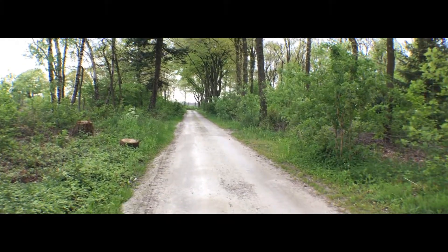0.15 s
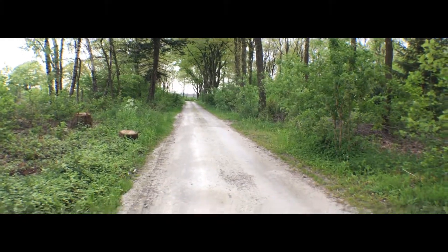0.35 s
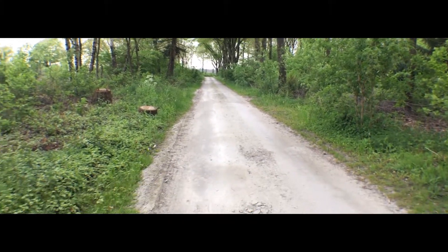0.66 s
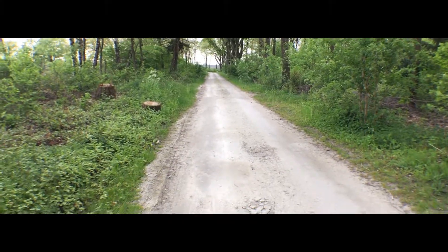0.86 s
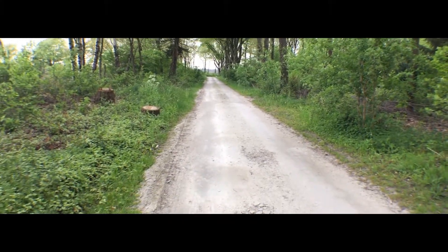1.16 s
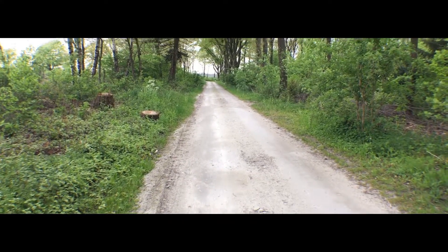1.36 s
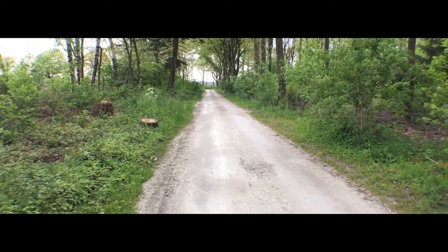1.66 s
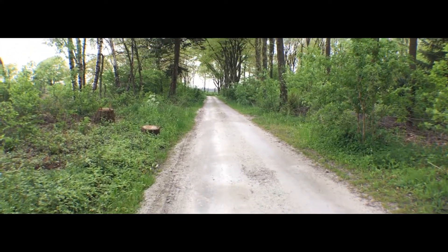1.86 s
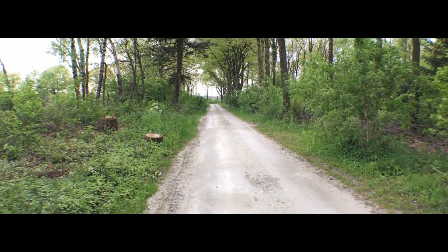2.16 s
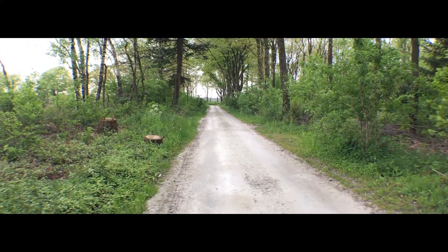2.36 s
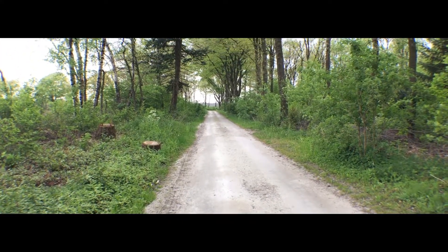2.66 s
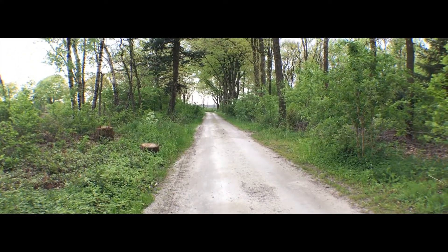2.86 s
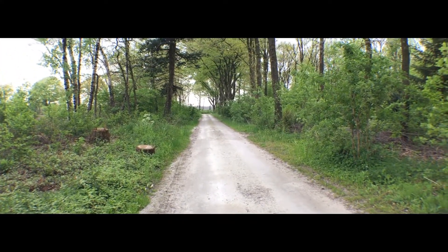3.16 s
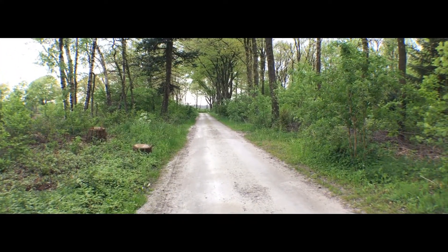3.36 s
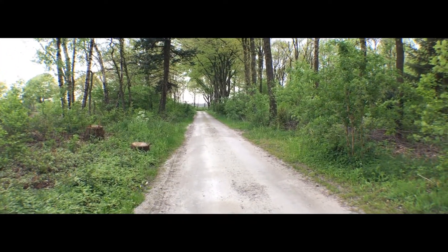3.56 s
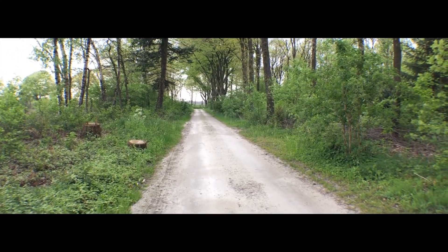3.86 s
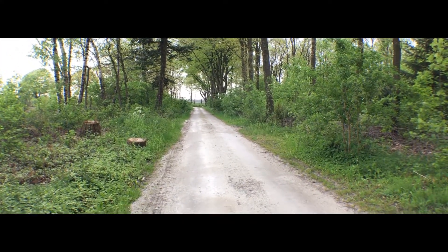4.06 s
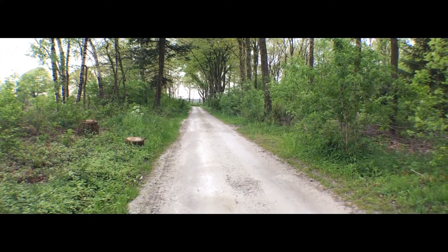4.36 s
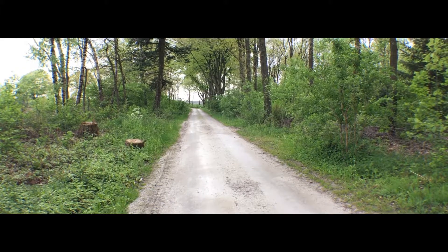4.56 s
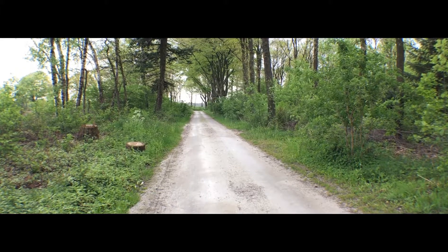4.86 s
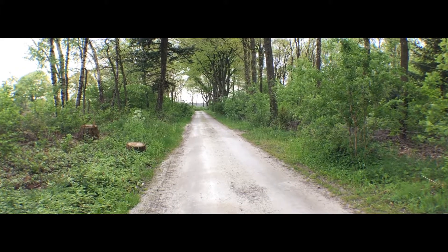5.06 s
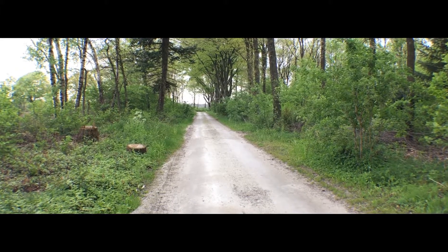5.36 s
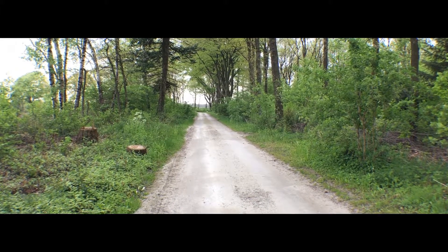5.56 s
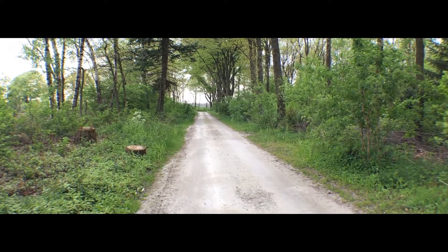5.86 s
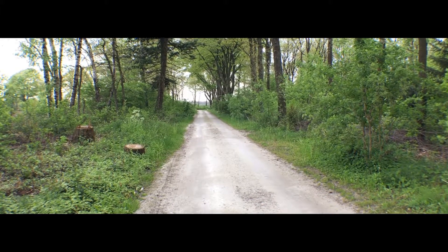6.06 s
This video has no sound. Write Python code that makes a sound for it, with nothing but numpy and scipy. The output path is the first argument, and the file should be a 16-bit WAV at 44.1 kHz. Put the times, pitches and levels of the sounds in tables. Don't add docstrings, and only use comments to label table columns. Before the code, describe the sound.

Outdoors on a woodland track, heard through a slightly dull hand-held microphone. From 0 s a blurred chorus of far small birds throbs, with quick falling chips and whistles echoing off trunks. A nearer bird gives a thin, high falling trill at 0.4-0.65 s. Fingers tick the shell; a hard, sharp knock with small bounces lands near 0.7 s, followed by brief rubbing until about 1.5 s. High sliding notes answer at 1.1 s and 2 s, and the chorus swells near 1.5 s, then fades. One bird's short upward call repeats roughly every 0.8 s from 2 s to 6.2 s, among sparser whistles. A faint dove coos low at 3 s and longer at 5.5 s. Rubbing at 4-4.3 s leads to a knock at 4.6 s. Throughout, deep rumble, steady low hum, soft road roar and faint passing tyre whine.

```python
import sys
import numpy as np
from scipy import signal
from scipy.fft import rfft, irfft
from scipy.io import wavfile
from scipy.ndimage import uniform_filter1d

SR = 44100
rng = np.random.default_rng(int(sys.argv[2]) if len(sys.argv) > 2 else 0)


def wav_record(signal):
    frames = np.transpose(np.atleast_2d(signal))
    bounded = np.clip(frames, -1, 1)
    quanta = np.round(bounded * 32767).astype(np.int16)
    wavfile.write(sys.argv[1], SR, quanta)


def undo_db(level):
    steps = np.asarray(level, float) / 20
    return 10 ** steps


N = 274302


def shape(x, points):
    hz, db = np.transpose(points)
    bin_hz = np.arange(len(x) // 2 + 1) * SR / len(x)
    gain_db = np.interp(np.log(bin_hz + 1), np.log(hz), db)
    return irfft(rfft(x) * undo_db(gain_db), len(x))


def colour(x, points):
    y = shape(x, points)
    return y / np.std(y)


def walk(rate_hz):
    k = int(SR / rate_hz)
    held = np.repeat(rng.standard_normal(N // k + 1), k)
    slewed = uniform_filter1d(uniform_filter1d(held, k), k)
    return 1.3 * slewed[:N]


def add(out, start_s, sound):
    i = max(int(start_s * SR), 0)
    out[i:i + len(sound)] += sound[:N - i]


def tone(hz):
    return np.sqrt(2) * np.sin(2 * np.pi * np.cumsum(hz) / SR)


def trees(x, t60_s, wet_db, stir_hz):
    t = np.arange(SR) / SR
    build_up = np.minimum(t / 0.013, 1)
    tail = rng.standard_normal(SR) * np.exp(-np.log(1000) * t / t60_s) * build_up
    stirred = x * np.sqrt(2) * np.sin(2 * np.pi * walk(stir_hz / 2))
    echo = signal.fftconvolve(stirred, tail / np.linalg.norm(tail))[:N]
    return x + undo_db(wet_db) * echo * undo_db(2 * walk(40))


def slides(notes, early=.5):
    return [(s, length_s, hz_a, hz_a + early * (hz_c - hz_a), hz_c, db)
            for s, length_s, hz_a, hz_c, db in notes]


def songs(notes, edge, fade_db, waver):
    out = np.zeros(N)
    unsteady = 1 + waver * walk(90)
    for start_s, length_s, hz_a, hz_b, hz_c, db in notes:
        u = np.linspace(0, 1, max(int(length_s * SR), 16))
        bend_hz = (hz_a + hz_c - 2 * hz_b) * 2 * (u - .5) ** 2
        hz = hz_b + (hz_c - hz_a) * (u - .5) + bend_hz
        hz = hz * unsteady[int(start_s * SR):][:len(u)]
        level = undo_db(db - fade_db * (u - .5)) * signal.windows.tukey(len(u), edge)
        add(out, start_s, level * tone(hz))
    return out * undo_db(1.3 * walk(50) + 1.3 * walk(160))


# (time [s], lowest pitch [Hz], level [dB])
TRILL = [
    (.41, 8270, -71),
    (.435, 8300, -68),
    (.46, 8400, -65),
    (.488, 8250, -62),
    (.511, 7850, -58),
    (.544, 7620, -58),
    (.575, 7000, -58),
    (.606, 6880, -59),
]
# (time [s], middle pitch [Hz], level [dB])
FLICKS = [
    (.628, 6400, -57),
    (2.029, 6800, -66),
    (2.16, 6700, -65),
    (2.364, 6500, -65),
]
# (time [s], length [s], start pitch [Hz], end pitch [Hz], level [dB])
NEAR_NOTES = [(.637, .03, 6390, 6400, -68), (.674, .11, 6350, 6480, -62), (.67, .064, 5790, 5665, -75),
              (1.124, .013, 5450, 6850, -60), (1.135, .038, 6960, 7260, -53),
              (1.168, .026, 7650, 7880, -61), (1.17, .035, 7300, 7450, -63), (1.21, .03, 8370, 8160, -75),
              (1.225, .02, 7600, 7050, -67), (1.245, .04, 7080, 7040, -76), (1.25, .03, 7430, 7520, -72),
              (1.562, .018, 7660, 6710, -72), (1.981, .011, 7000, 7500, -60), (1.99, .008, 7500, 8100, -66),
              (1.998, .014, 8140, 7330, -65), (2.008, 0.023, 7930, 8120, -65), (2.07, .03, 7140, 7110, -74),
              (2.115, .016, 7210, 7580, -61), (2.13, .011, 8420, 7590, -69), (2.134, .026, 7560, 7900, -65),
              (2.163, .005, 5650, 5300, -63), (2.1, .015, 7400, 7300, -72), (2.26, .11, 7370, 7500, -73.5),
              (2.385, .025, 5720, 5270, -76), (5.2, 0.088, 5820, 6460, -81)]


def near_bird():
    trill = []
    for s, hz, db in TRILL:
        scoop_out_hz = 200 + .4 * (8400 - hz)
        trill.append((s, .025, hz + 120, hz, hz + scoop_out_hz, db))
    fall_hz = 1710
    flicks = [(s, .005, hz + fall_hz / 2, hz - fall_hz / 2, db) for s, hz, db in FLICKS]
    song = songs(trill + slides(NEAR_NOTES + flicks), edge=.35, fade_db=3, waver=.007)
    return trees(song, t60_s=.5, wet_db=-5, stir_hz=250)


# (time of the steep rise [s], lead-in stretch [ratio], level [dB], extra level of the rise [dB])
RISING_CALLS = [
    (1.985, 1.04, -57, -11),
    (2.745, 1.0, -67, -3),
    (3.568, .9, -60, -3),
    (4.413, 1.7, -63, -2),
    (5.335, 1.2, -60, -10),
    (6.152, 1.5, -64, -4),
]
# (time from the rise [s], pitch [Hz], level [dB])
RISING_SHAPE = [
    (-.028, 3220, -14),
    (-.016, 3250, -4),
    (0, 3388, -7),
    (.012, 3620, 4),
    (.02, 3995, -1.5),
    (.036, 4050, -5),
    (.044, 4050, -25),
]


def rising_calls():
    out = np.zeros(N)
    s, hz, db = np.transpose(RISING_SHAPE)
    for rise_s, stretch, call_db, rise_db in RISING_CALLS:
        knots = np.where(s < 0, s * stretch, s)
        t = np.arange(knots[0], knots[-1], 1 / SR)
        level_db = call_db + np.interp(t, knots, db + rise_db * (s > 0))
        add(out, rise_s + knots[0], undo_db(level_db) * tone(np.interp(t, knots, hz)))
    return trees(out * undo_db(2.7 * walk(150)), t60_s=.75, wet_db=2.5, stir_hz=110)


# (time [s], length [s], pitch [Hz], level [dB])
HELD = [(0, .018, 2630, -59), (.145, .05, 2720, -62), (.243, .035, 4350, -69), (.105, .035, 4280, -65),
        (.695, .085, 2690, -66), (.935, .045, 4420, -65), (.99, .025, 4500, -67), (1.01, .03, 4200, -66),
        (1.045, .035, 4440, -65), (1.14, .03, 3950, -67), (1.165, .03, 3380, -64), (1.405, .065, 3250, -62),
        (1.64, .1, 3700, -64), (1.752, .022, 3640, -62), (2.779, .014, 3500, -56), (2.73, .03, 4380, -68),
        (2.255, .03, 5150, -72), (3.875, .03, 3500, -77), (4.08, .13, 3550, -70), (.02, .12, 1955, -65.5),
        (.092, .045, 2730, -62), (.75, .12, 4410, -75), (2.458, 0.24, 5320, -76), (1.4, .062, 3280, -61.5),
        (1.555, .095, 3720, -63), (1.6, .045, 2483, -60), (1.6, .06, 3030, -74), (2.1, .11, 5140, -80),
        (2.329, 0.051, 3125, -57.5), (2.41, 0.046, 5295, -60), (2.54, .07, 4380, -62.5),
        (2.539, 0.11, 3294, -63), (2.548, .1, 2870, -67), (2.68, .04, 4380, -67), (2.664, .06, 3645, -61),
        (3.92, .055, 3580, -74), (5.303, .033, 6010, -83), (5.3, .14, 5290, -80), (5.421, .11, 4350, -66),
        (5.64, .018, 4340, -74), (5.86, .05, 3170, -71), (5.854, 0.062, 2885, -67), (5.948, .02, 3400, -66),
        (5.99, .1, 3800, -74), (6.01, .08, 5420, -74)]
# (time [s], length [s], pitch [Hz], level [dB])
COOS = [
    (2.974, .074, 678, -59),
    (5.553, .34, 655, -64),
]
# (time [s], length [s], start pitch [Hz], end pitch [Hz], level [dB])
SLURS = [(.026, .035, 2650, 2700, -60), (.052, .03, 2710, 2750, -56), (.18, .02, 2330, 2460, -62),
         (.195, .055, 2460, 2480, -61), (.243, .055, 2380, 2290, -59), (.296, .025, 2330, 2270, -56),
         (.784, .03, 2570, 2480, -60), (.806, .1, 2480, 2455, -61), (.896, .075, 2455, 2430, -65),
         (1.176, .05, 2700, 2520, -70), (1.22, .075, 2540, 2680, -66), (.34, .02, 3450, 3900, -64),
         (2.678, .05, 3180, 3310, -64), (.28, .04, 2920, 2820, -63), (0.317, .05, 2130, 2045, -66),
         (.462, .044, 3500, 3340, -54), (.82, .11, 3060, 3120, -70), (1.098, 0.13, 3210, 3390, -68),
         (1.31, .03, 3600, 3520, -64), (1.333, .048, 3520, 3110, -58), (1.5, 0.043, 4735, 4915, -71),
         (2.299, .022, 3120, 2850, -62), (2.372, 0.17, 3190, 3360, -57), (2.52, 0.0296, 3260, 2810, -58.5),
         (2.733, .035, 3620, 3520, -65), (5.445, 0.077, 4130, 4300, -71), (5.53, .06, 5220, 5130, -76),
         (5.944, .06, 5620, 5420, -71), (5.458, .028, 3620, 2800, -69), (5.55, .045, 3255, 3180, -62.5),
         (5.902, .042, 3130, 3750, -70)]


def far_whistlers():
    held = [(s, length_s, hz, hz, db) for s, length_s, hz, db in HELD + COOS]
    song = songs(slides(held + SLURS, early=.64), edge=.22, fade_db=3, waver=.005)
    return trees(song, t60_s=.72, wet_db=-4, stir_hz=70)


# (time [s], middle pitch [Hz], fall [Hz], level [dB])
CHIPS = [(0, 3400, 50, -56), (.012, 3400, 30, -51), (.022, 3390, 30, -52), (.08, 3510, 180, -59),
         (.1, 4340, 50, -65), (.143, 3520, 90, -54.5), (.155, 3930, 30, -61), (.178, 3500, 340, -55),
         (.215, 3410, 200, -57), (.545, 3310, 150, -60), (.56, 3520, 400, -60), (.61, 3600, 60, -58),
         (1.06, 3200, 300, -59), (1.397, 3150, 800, -58), (1.475, 3250, 600, -58), (1.528, 2930, 250, -60),
         (1.58, 3110, 720, -56), (1.68, 3150, 700, -56)]


def chips():
    notes = [(s, .013, hz + fall_hz / 2, hz - fall_hz / 2, db) for s, hz, fall_hz, db in CHIPS]
    song = songs(slides(notes), edge=.41, fade_db=5, waver=.01)
    return trees(song, t60_s=.84, wet_db=-1.5, stir_hz=150)


# (time [s], centre pitch [Hz], level [dB])
CHORUS = [
    (0, 3450, -60.5),
    (.35, 3456, -64.5),
    (.7, 3696, -70),
    (.95, 3800, -62),
    (1.2, 3780, -62),
    (1.3, 3490, -67),
    (1.5, 3197, -59),
    (1.75, 3300, -69.5),
    (2.7, 3610, -85),
]


def chorus():
    t = np.arange(N) / SR
    s, centre_hz, level_db = np.transpose(CHORUS)
    hz, db = np.interp(t, s, centre_hz), np.interp(t, s, level_db)
    reach_hz = 430 + (760 - 430) / (1 + np.exp((t - 1.3) / .12))
    voices = np.zeros(N)
    for place in np.linspace(-1, 1, 8):
        throb = undo_db(2 * walk(35))
        hops = .15 * walk(15) + .2 * walk(70)
        voices += throb * tone(hz + reach_hz * (place + hops))
    return trees(voices * undo_db(db - 16.5), t60_s=.36, wet_db=5.7, stir_hz=200)


# (time [s], peak level [dB], contact [ms])
KNOCKS = [
    (.6632, -25, .033),
    (.683, -39, .2),
    (.6885, -39, .08),
    (0.78, -46, 0.047),
    (2.366, -52, 0.089),
    (4.598, -47, .1),
    (4.6109, -35, .15),
]
# (frequency [Hz], level [dB], 60 dB decay [s])
SHELL = [(316, -2, .05), (660, -23, 0.023), (885, 10.5, .023), (1160, -29, 0.019), (1494, 3, 0.025),
         (1555, -9, .15), (1900, -3, .008), (2275, 0, 0.016), (3390, 4, .013), (4520, 7, .006),
         (5400, 2, .005), (7300, -12, .007), (9050, -6, .011), (13200, 2, .003)]


def knocks():
    out = np.zeros(N)
    t = np.arange(int(.08 * SR)) / SR
    ring = np.zeros(len(t))
    for hz, db, t60_s in SHELL:
        envelope = np.exp(-np.log(1000) * t / t60_s) * np.tanh(hz * t / 0.83)
        ring += undo_db(db) * envelope * np.sin(2 * np.pi * hz * t)
    for start_s, db, contact_ms in KNOCKS:
        push = np.exp(-(t[:200] * 1000 / contact_ms - 2) ** 2)
        blow = np.convolve(ring, push)
        add(out, start_s, undo_db(db) * blow / abs(blow).max())
    return out


# (time [s], peak level [dB], brightness [dB per octave])
TICKS = [(.028, -55, 4), (.237, -57, 6), (.294, -58, 5), (.314, -58, 4), (.363, -55, 3), (.5988, -45, -2),
         (.606, -52, -2), (.6632, -36, -1), (.6895, -45, -1), (.712, -56, -1), (.988, -55, 5),
         (1.093, -58, 5), (1.373, -59, 3), (1.417, -55, 4), (1.53, -58, 1), (2.073, -60, 3),
         (2.168, -60, 4), (2.365, -46, -8.5), (2.439, -56, 1), (4.47, -68, 8), (4.52, -60, 2),
         (4.598, -52, -1), (4.6104, -55, 1), (4.621, -54, 8), (4.731, -72, 5), (4.739, -60, 5)]


def ticks():
    out = np.zeros(N)
    t = np.arange(1024) / SR
    rise_s = .0006
    for start_s, db, tilt_db in TICKS:
        outline = [(hz, level_db + tilt_db * np.log2(hz / 5000)) for hz, level_db in RUB_COLOUR]
        noise = colour(rng.standard_normal(len(t)), outline)
        crack = noise * t / rise_s * np.exp(1 - t / rise_s)
        add(out, start_s, undo_db(db) * crack)
    return out


# (time [s], length [s], level [dB], swell [dB])
RUBS = [(.602, 0.053, -62, 0), (.77, .055, -65, 0), (.967, 0.011, -55.5, 0), (.982, .024, -58, -3),
        (1.068, .035, -60, -5), (1.099, .23, -66.5, -4), (1.5, 0.066, -61.5, 5), (2.368, .075, -67, -13),
        (3.982, .02, -66, 0), (4.064, .085, -63.5, 0), (4.149, .125, -65, 0), (4.274, .068, -59, -2)]
# (frequency [Hz], level [dB])
RUB_COLOUR = [(1400, -12), (2200, -3), (3500, -2), (4500, -7), (4810, -2), (5200, -9), (7000, -11),
              (8400, -17), (9050, -10), (9900, -20), (11100, -13), (12300, -18), (13500, -8), (14500, -13),
              (15500, -17)]


def rubs():
    t = np.arange(N) / SR
    pressure = np.zeros(N)
    for s, length_s, db, swell_db in RUBS:
        swell = swell_db * np.clip((t - s) / length_s - .5, -.5, .5)
        from_edge_s = np.minimum(t - s, s + length_s - t)
        contact = np.clip(from_edge_s / .008 + .5, 0, 1) ** 2
        pressure += undo_db(db + swell) * contact
    slips = rng.standard_normal(N) * undo_db(2.1 * walk(300))
    return pressure * colour(slips, RUB_COLOUR)


# (time nearest [s], heard for plus or minus [s], tyre whine [Hz], level [dB])
CARS = [
    (.95, .17, 1560, -62),
    (1.35, .2, 1520, -66),
    (1.85, .4, 1540, -61.5),
    (2.3, .15, 1905, -65),
    (3.1, .2, 1850, -61.5),
    (4.15, .2, 1867, -62),
    (5.1, .25, 2100, -63),
    (6.05, .2, 2140, -59),
]


def tyres():
    t = np.arange(N) / SR
    s, heard_s, hz, db = np.transpose(CARS)[:, :, None]
    power = undo_db(2 * db) / (1 + ((t - s) / heard_s) ** 2) ** 2
    total = power.sum(axis=0)
    band = [(1, -11), (200, -5), (420, -22), (20000, -56.5)]
    slow_a = colour(rng.standard_normal(N), band)
    slow_b = colour(rng.standard_normal(N), band)
    turn = 2 * np.pi * np.cumsum((power * hz).sum(axis=0) / total) / SR
    whine = slow_a * np.cos(turn) + slow_b * np.sin(turn)
    return whine * np.sqrt(total) * undo_db(0.4)


# (frequency [Hz], level [dB per Hz])
ROAD = [(200, -7.5), (450, -7), (650, -2), (760, -5), (900, -1.5), (1300, -1.5), (1600, -6.5),
        (2400, -14.5), (2800, -20), (3400, -18), (5000, -26), (8000, -30), (16000, -43.5)]
# (frequency [Hz], gain [dB])
LULL_BAND = [(1000, -30), (1300, -3), (1700, 0), (2000, -30)]


def roar():
    t = np.arange(N) / SR
    noise = colour(rng.standard_normal(N), ROAD) * undo_db(-55 + .5 * walk(1.03))
    lull_ends_s, fade_s, share = .42, .06, .5
    lull = share / (1 + np.exp((t - lull_ends_s) / fade_s))
    return noise - lull * shape(noise, LULL_BAND)


# (frequency [Hz], level [dB per Hz])
RUMBLE = [(12, -24), (22, -8.5), (32, -2), (55, 2), (80, -4.5), (130, -11), (175, -19), (300, -21),
          (500, -27.5), (1000, -54)]


def rumble():
    return colour(rng.standard_normal(N), RUMBLE) * undo_db(-44.5 + 0.2 * walk(3.015))


# (frequency [Hz], level [dB])
HUM = [
    (49.2, -39),
    (98.4, -58),
]


def hum():
    return sum(undo_db(db) * tone(np.full(N, hz)) for hz, db in HUM)


def scene():
    birds = near_bird() + rising_calls() + far_whistlers() + chips() + chorus()
    hands = trees(knocks() + ticks(), t60_s=.21, wet_db=-11, stir_hz=400) + rubs()
    background = tyres() + roar() + rumble() + hum()
    return (birds + hands + background)[None]


def low_pass(x):
    return signal.sosfilt(signal.butter(12, 15840, fs=SR, output="sos"), x)


# (frequency [Hz], gain [dB])
MICROPHONE = [(10, -0.5), (7000, -1.5), (7800, -5), (9050, -2.5), (10400, -6.5), (11200, -3.5),
              (12600, -5.5), (13600, -6.5), (15720, -8.5), (15850, -25)]


def record(dry):
    mix = shape(dry[0], MICROPHONE)[None]
    return low_pass(mix)


dry = scene()
out = record(dry)
wav_record(out)
```